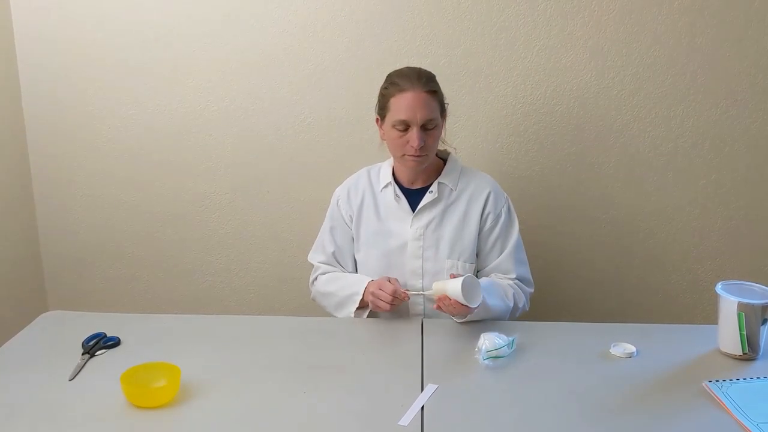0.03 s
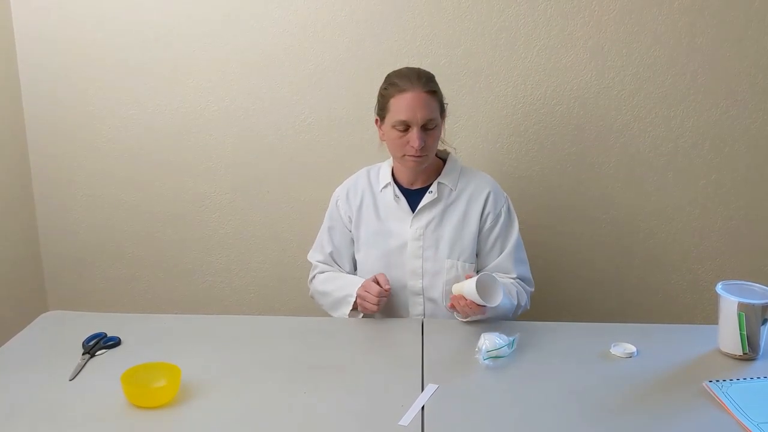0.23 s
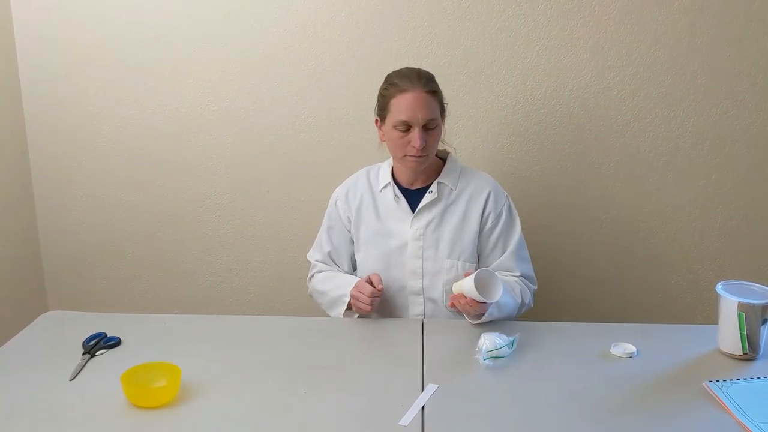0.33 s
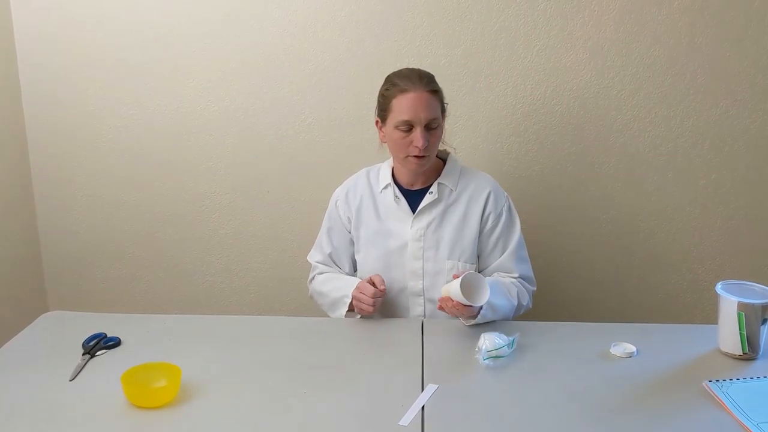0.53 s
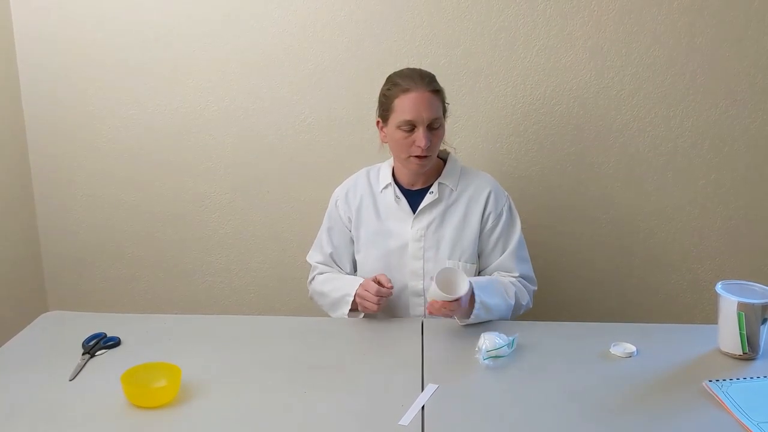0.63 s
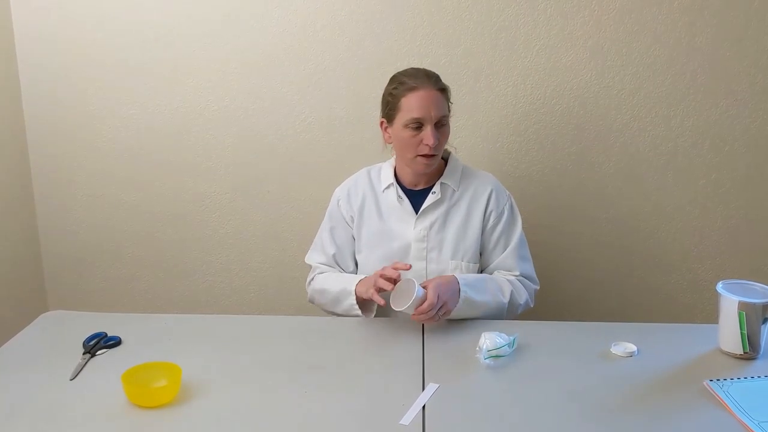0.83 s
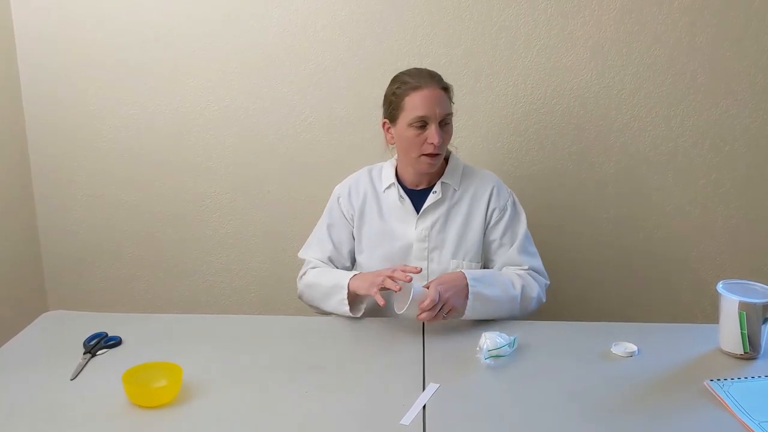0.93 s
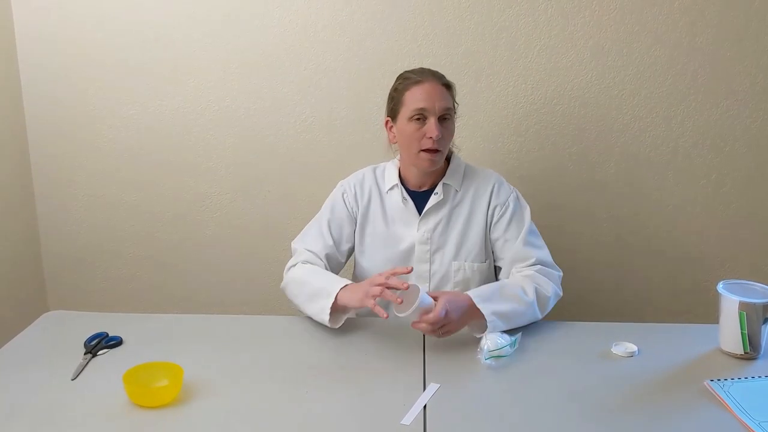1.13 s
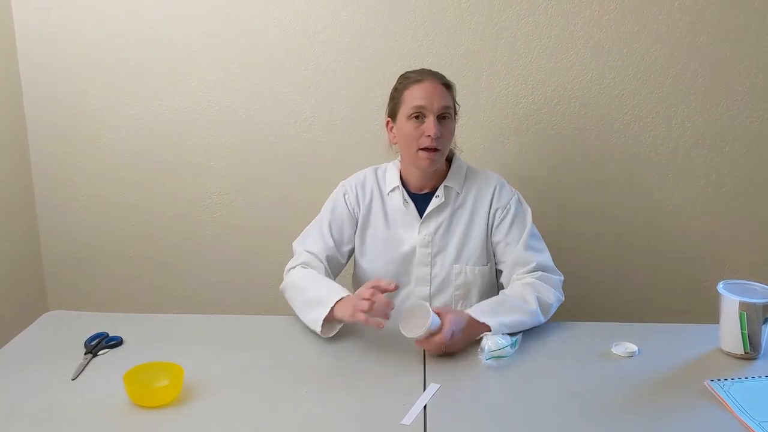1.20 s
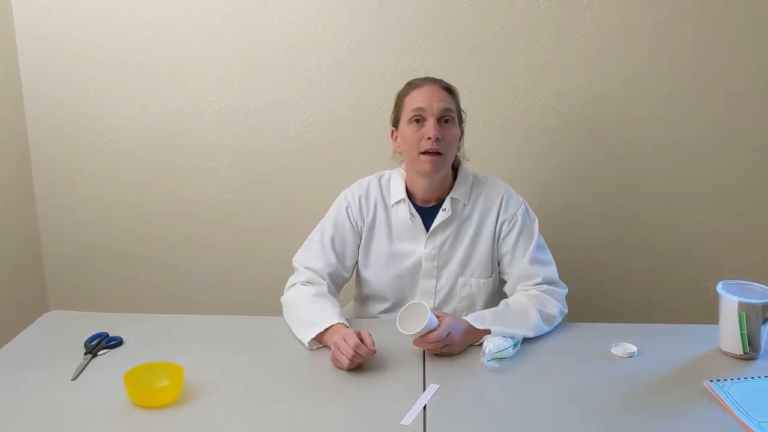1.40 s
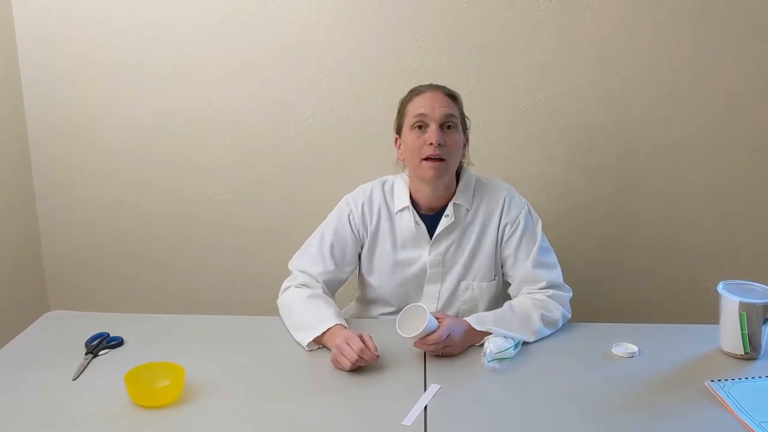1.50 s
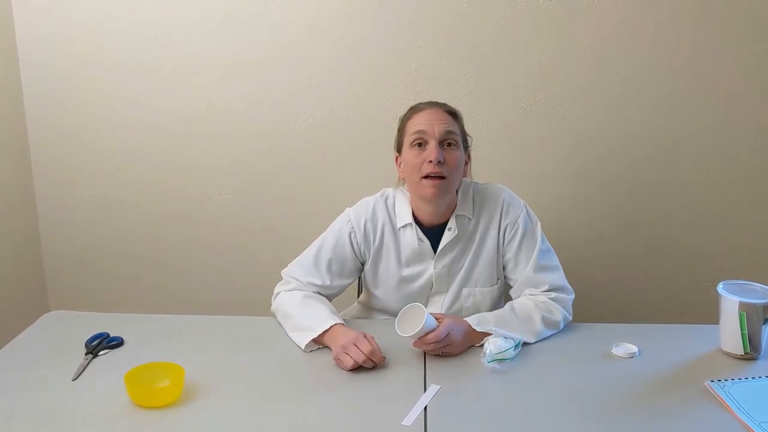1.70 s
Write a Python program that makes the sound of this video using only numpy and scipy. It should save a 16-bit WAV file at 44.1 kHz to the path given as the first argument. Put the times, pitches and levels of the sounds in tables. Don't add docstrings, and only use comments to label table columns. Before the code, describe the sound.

After a faint rubber creak, a taut balloon skin slaps a paper cup with one loud crack close to the microphone; bare walls ring, a tiny tick lands away, then forearms thump a hollow table with rustling sleeves.

```python
import sys
import numpy as np
from scipy import signal
from scipy.fft import rfft, irfft, next_fast_len
from scipy.io import wavfile
from scipy.ndimage import uniform_filter1d

SR = 44100
rng = np.random.default_rng(int(sys.argv[2]) if len(sys.argv) > 2 else 0)


def boost_factor(decibels):
    exponent = np.asarray(decibels, float) / 20
    return 10 ** exponent


def to_wav(s):
    ch = np.atleast_2d(s).T
    pcm = np.round(np.clip(ch, -1, 1) * 32767)
    wavfile.write(sys.argv[1], SR, pcm.astype(np.int16))


N = 77175

# delay after the snap in seconds, level in dB.
SLAPS = [
    (0, -1),
    (.0016, -5.5),
    (.0057, -3.5),
]
# frequency in Hz, level in dB, t60 in seconds.
CUP_MODES = [(639, 1, 0.027), (575, -6, 0.058), (1049, -2, .03), (1200, -5, 0.097), (2050, -28, 0.036),
             (2600, -6, 0.023), (4000, -10.5, 0.0094)]
# frequency in Hz, level in dB per Hz.
CRACK_SPECTRUM = [(88, -64.5), (150, -35), (534, -9), (1100, -19.5), (1190, -18), (1660, -22.5),
                  (4000, -32), (16000, -57.5)]
# frequency in Hz, left over right in dB.
SNAP_LEAN = [(500, 2), (1500, -7), (4000, 18.5), (9000, 16), (13000, -17)]
# frequency in Hz, width in Hz, level in dB.
THROWN_PEAKS = [(100, 80, -19), (306, 180, -10.5), (578, 64, 4), (752, 82, 3.5), (900, 62, -4),
                (1032, 110, 4), (1196, 67, 6.5), (1246, 80, -7), (1556, 95, -11.5), (1864, 180, -9.5),
                (2860, 730, -14.5), (3940, 170, -10), (5090, 2300, -38), (11010, 8400, -24)]
# time in seconds, level in dB.
STRETCH_LEVEL = [(0.0, -72.5), (0.004, -69), (0.098, -62.5), (0.218, -78.5), (0.232, -43.5)]
# frequency in Hz, width in Hz, level in dB.
SKIN_PEAKS = [(694, 420, -9.5), (1180, 200, -4.5), (1650, 300, -14), (2500, 600, -22)]
# start in seconds, peak in dB, centre in Hz, width in Hz,
# room share in dB (more for far ones).
TICKS = [(.026, -54, 9100, 9000, 3), (0.1105, -59, 4280, 700, 11.5), (.148, -55, 5130, 700, -15),
         (0.6864, -44, 12000, 8900, 2), (.728, -52, 2287, 500, -6), (.7672, -52, 8040, 9000, -5),
         (.802, -55.5, 2790, 5150, 21.5), (0.8051, -26, 9506, 7730, 0.5), (.8054, -38, 5820, 1492, -8),
         (.816, -39, 10100, 3000, 2), (0.9781, -41.5, 6800, 2500, -8), (.979, -40, 3660, 2000, 2),
         (.9825, -44, 2100, 1490, -1), (1.3, -56.5, 2190, 740, 4.5), (1.3109, -43, 2350, 600, -5.5),
         (1.355, -39.5, 2500, 900, 3.5), (1.424, -32.5, 1200, 700, -0.5), (1.4225, -40, 9050, 6000, -4.5),
         (1.4288, -30.5, 2600, 586, -5), (1.481, -41, 2500, 504, -1.5), (1.6863, -39.5, 11700, 6100, 9.5)]
# time in seconds, level in dB.
SLIDE_LEVEL = [(1.306, -79), (1.312, -41), (1.335, -40), (1.39, -43.5), (1.445, -32.5), (1.54, -44.5),
               (1.645, -56), (1.685, -45.5), (1.75, -61)]
# frequency in Hz, width in Hz, level in dB.
TOP_PEAKS = [(40, 22, 7.5), (75.8, 90, -8), (150, 55, 1.5), (258, 38, 3.5), (422, 114, -5), (595, 71, 1.5),
             (732, 500, -8.5)]
# frequency in Hz, width in Hz, level in dB.
SCUFF_PEAKS = [(2500, 530, 0)]
# start in seconds, peak in dB.
THUMPS = [(1.4085, -31), (1.4145, -28), (1.4285, -21), (1.4415, -20), (1.4545, -22), (1.4635, -28),
          (1.4685, -27), (1.484, -33), (1.56, -39), (1.672, -44), (1.70, -46)]
# frequency in Hz, level in dB, t60 in seconds.
BOOM_MODES = [(71.4, -10.5, .07), (150, -9.5, 0.077), (259, -4.5, .06)]
# start in seconds, level in dB, rise in seconds, t60 in seconds.
RUSTLES = [
    (1.306, -53, 0.022, 0.27),
    (1.344, -50.5, .015, 0.41),
    (1.424, -41, .004, 0.12),
    (1.468, -54, .015, 0.5),
    (1.672, -54, 0.016, 0.39),
]
# frequency in Hz, level in dB per Hz.
CLOTH_SPECTRUM = [(590, -50), (1000, -7), (1960, -1.5), (2680, -4.5), (5130, -10.5), (11400, -18.5),
                  (16000, -18)]
# frequency in Hz, t60 in seconds.
ROOM_T60 = [(100, 0.18), (300, 0.58), (1200, 0.68), (4000, 0.59), (10000, 0.34), (16000, 0.17)]
# frequency in Hz, left-right likeness from -1 to 1.
ROOM_ALIKE = [(100, 0.33), (400, 0.67), (1200, 0), (8000, 0)]
# frequency in Hz, level in dB per Hz.
AIR_SPECTRUM = [(15, -57), (25, -8.5), (127, -4.5), (200, -6.5), (293, -14.5), (1650, -20.5), (2410, -21),
                (12500, -30), (16000, -33.5)]
# frequency in Hz, left-right likeness from -1 to 1.
AIR_ALIKE = [(60, 1), (380, 0.59), (2380, 0.47), (15000, -0.69)]

SNAP_S, SNAP_DB, ATTACK_S = .2402, -1, .0015
SLIP_S, SLIP_DB = .0035, -22.5
CRACK_DB, CRACK_T60, CRACK_RISE_S = -8, .03, .002
PUFF_S, PUFF_DB = .01, -32.5
THROWN_DB, THIN_HZ = 15, 235
TICK_T60, TICK_ROUGH, TICK_PAN_DB = .004, .35, 6
GRAINS_PER_S, GRAIN_DB, SOFT_HZ, SCUFF_DB = 2500, 2, 900, -21
PUSH_S = .004
WALL_S = .005
RUB_ROOM_DB, TICK_ROOM_DB, TABLE_ROOM_DB = 8, 6, -2
DRY_HZ = 199
AIR_DB = -61.5


def unit(x):
    return x / np.sqrt(np.mean(x ** 2) + 1e-20)


def along(points, hz):
    f, value = np.transpose(points)
    return np.interp(np.log(hz + 1), np.log(f + 1), value)


def level(rows):
    s, db = np.transpose(rows)
    return boost_factor(np.interp(np.arange(N) / SR, s, db, left=-200, right=-200))


def filtered(x, response):
    m = next_fast_len(N + SR // 2)
    hz = np.fft.rfftfreq(m, 1 / SR)
    return irfft(rfft(x, m) * response(hz), m)[..., :N]


def resonance(f, centre, width, db):
    return boost_factor(db) * 1j * f * width / (centre * centre - f * f + 1j * f * width)


def resonances(peaks):
    return lambda f: sum((-1) ** k * resonance(f, *peak) for k, peak in enumerate(peaks))


def highpass(hz):
    return lambda f: 1j * f / (hz + 1j * f)


def add(track, s, sound):
    part = track[..., round(s * SR):][..., :sound.shape[-1]]
    part += sound[..., :part.shape[-1]]


def blow(s):
    return 1. * (np.arange(N) == round(s * SR))


def ring(modes, t):
    sines = sum(boost_factor(db - 60 * t / t60) * np.sin(2 * np.pi * hz * t) for hz, db, t60 in modes)
    return sines * (1 - np.exp(-t / ATTACK_S))


def spread(pair, alike):
    def mid_side(hz):
        turn = np.arccos(np.clip(along(alike, hz), -1, 1)) / 2
        return np.array([np.cos(turn), np.sin(turn)])
    mid, side = filtered(pair, mid_side)
    return np.array([mid + side, mid - side])


def noise(spectrum, channels=1):
    white = rng.standard_normal((channels, N))
    return unit(filtered(white, lambda hz: boost_factor(along(spectrum, hz))))


def snap():
    out, t = np.zeros(N), np.arange(SR // 5) / SR
    for late, db in SLAPS:
        add(out, SNAP_S + late, -boost_factor(db - 9) * ring(CUP_MODES, t))
    crack_shape = boost_factor(CRACK_DB - 60 * t / CRACK_T60) * np.clip(t / CRACK_RISE_S, 0, 1)
    add(out, SNAP_S, crack_shape * noise(CRACK_SPECTRUM)[0, :len(t)])
    slip_rise = np.arange(round(SLIP_S * SR)) / (SLIP_S * SR)
    add(out, SNAP_S - SLIP_S, boost_factor(SLIP_DB) * slip_rise * rng.standard_normal(len(slip_rise)))
    out = filtered(out, lambda f: highpass(THIN_HZ)(f) ** 2)
    add(out, SNAP_S, boost_factor(PUFF_DB) * np.sin(2 * np.pi * np.clip(t / PUFF_S, 0, 1)))
    return boost_factor(SNAP_DB) * out


def thrown():
    wide = filtered(blow(SNAP_S), lambda f: sum(resonance(f, *peak) for peak in THROWN_PEAKS))
    return boost_factor(THROWN_DB) * wide / np.linalg.norm(wide)


def stretch():
    return level(STRETCH_LEVEL) * unit(filtered(rng.standard_normal(N), resonances(SKIN_PEAKS)))


def ticks():
    near, far, t = np.zeros((2, N)), np.zeros(N), np.arange(SR // 100) / SR
    pan_db = np.array([[TICK_PAN_DB], [-TICK_PAN_DB]]) / 2
    for s, db, hz, width, room_db in TICKS:
        touch = np.array([blow(s), blow(s)])
        add(touch[0], s, TICK_ROUGH * boost_factor(-60 * t / TICK_T60) * rng.standard_normal(len(t)))
        click, smooth = filtered(touch, lambda f: resonance(f, hz, width, 0) ** 2)
        near += boost_factor(db + pan_db) * click / np.abs(click).max()
        far += boost_factor(db + room_db) * smooth / np.abs(smooth).max()
    return near, far


def slide():
    strength = boost_factor(GRAIN_DB * rng.exponential(size=N)) * rng.standard_normal(N)
    grains = (rng.random(N) < GRAINS_PER_S / SR) * strength
    drag = unit(filtered(grains, lambda f: resonances(TOP_PEAKS)(f) / (1 + 1j * f / SOFT_HZ) ** 2))
    scuff = unit(filtered(rng.standard_normal(N), lambda f: resonances(SCUFF_PEAKS)(f) ** 2))
    return level(SLIDE_LEVEL) * (drag + boost_factor(SCUFF_DB) * scuff)


def thumps():
    out, t = np.zeros(N), np.arange(SR // 4) / SR
    push = np.sin(np.pi * np.clip(t / PUSH_S, 0, 1)) ** 2
    boom = np.pad(-ring(BOOM_MODES, t), (round(PUSH_S * SR), 0))[:len(t)] / 2
    for s, db in THUMPS:
        add(out, s, boost_factor(db) * (push + boom))
    return out


def table():
    return filtered(slide() + thumps(), lambda f: highpass(30)(f) ** 2)


def sleeves():
    t, shape = np.arange(N) / SR, np.zeros(N)
    for s, db, rise, t60 in RUSTLES:
        fade = boost_factor(db - 60 * np.maximum(t - s - rise, 0) / t60)
        shape += fade * np.clip((t - s) / rise, 0, 1)
    lumps = boost_factor(0.91 * unit(uniform_filter1d(rng.standard_normal(N), size=150)))
    return shape * lumps * noise(CLOTH_SPECTRUM)[0]


def room(x):
    hz, t, z = signal.stft(rng.standard_normal((2, SR)), SR, nperseg=256)
    decay = boost_factor(-60 * t / along(ROOM_T60, hz)[:, None])
    tail = signal.istft(z * decay, SR, nperseg=256)[1]
    tail = np.pad(tail / np.linalg.norm(tail[0]), ((0, 0), (round(WALL_S * SR), N)))[:, :N]
    return spread(signal.fftconvolve(x[None], tail, axes=1)[:, :N], ROOM_ALIKE)


def room_air():
    return boost_factor(AIR_DB) * unit(spread(noise(AIR_SPECTRUM, channels=2), AIR_ALIKE))


def scene():
    rub = stretch()
    sides = np.array([[1], [-1]])
    cup = filtered(snap() + rub, lambda hz: boost_factor(along(SNAP_LEAN, hz) / 2 * sides))
    near_ticks, far_ticks = ticks()
    desk = table() + sleeves()
    walls = room(thrown() + boost_factor(RUB_ROOM_DB) * rub + boost_factor(TICK_ROOM_DB) * far_ticks)
    desk_walls = boost_factor(TABLE_ROOM_DB) * room(filtered(desk, highpass(DRY_HZ)))
    return cup + near_ticks + walls + desk + desk_walls + room_air()


def top_cut(x):
    return signal.sosfilt(signal.butter(12, 16460, fs=SR, output="sos"), x)


def record(dry):
    mix = filtered(dry, lambda hz: np.sin(np.pi / 2 * np.clip((15900 - hz) / 600, 0, 1)) ** 2)
    return top_cut(mix)


dry = scene()
out = record(dry)
to_wav(out)
```